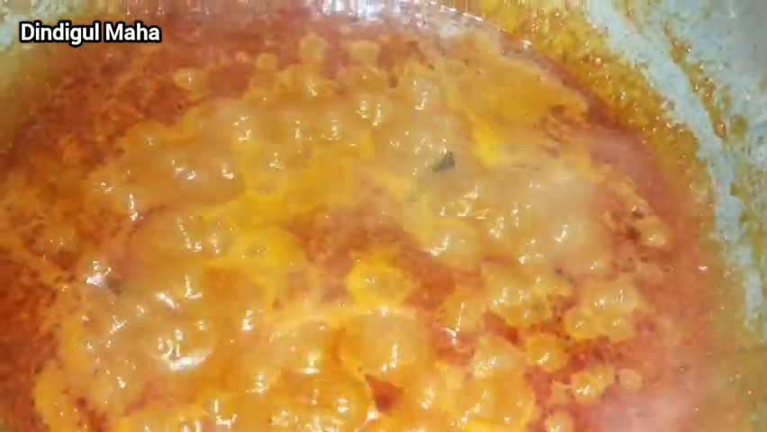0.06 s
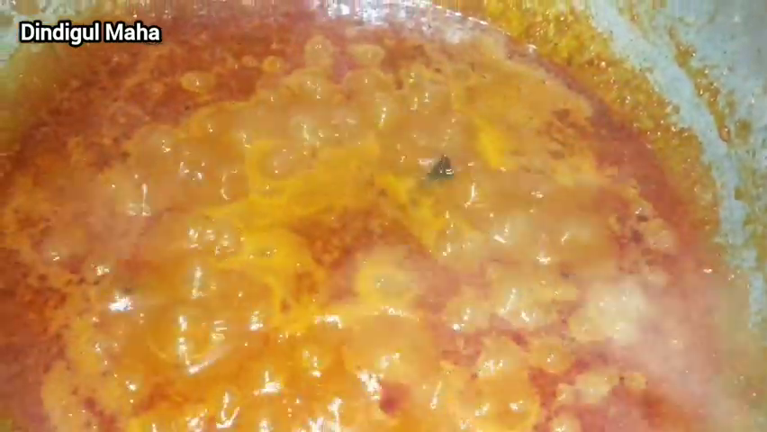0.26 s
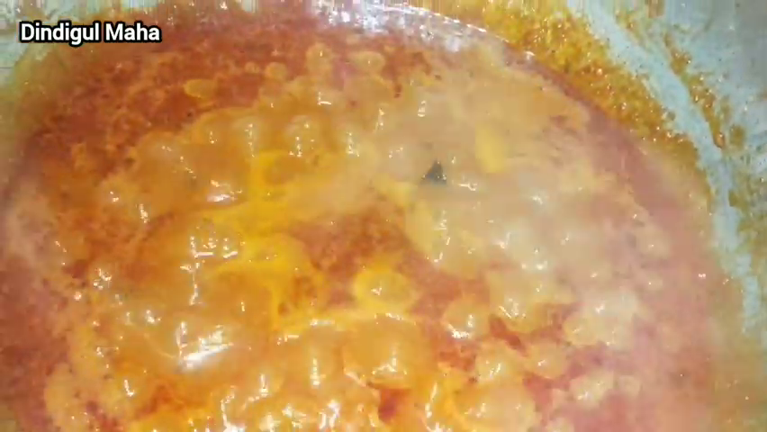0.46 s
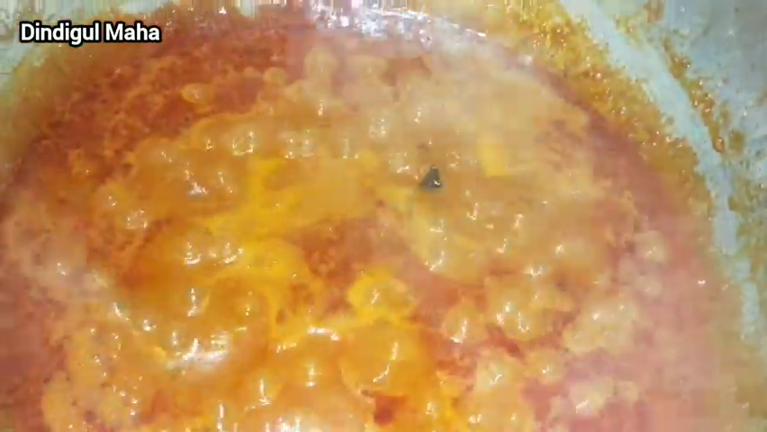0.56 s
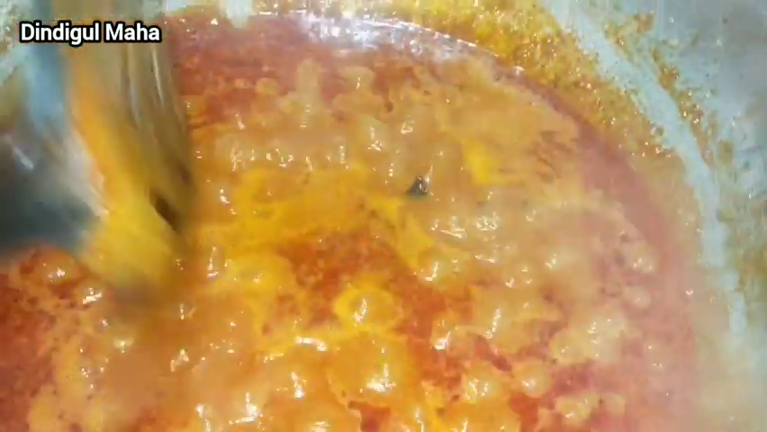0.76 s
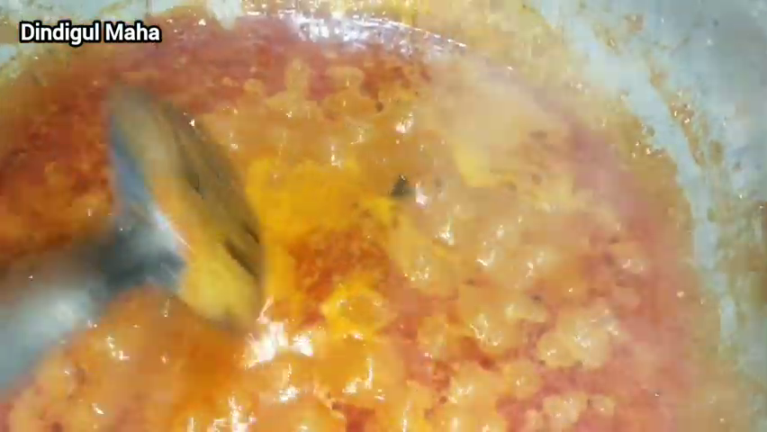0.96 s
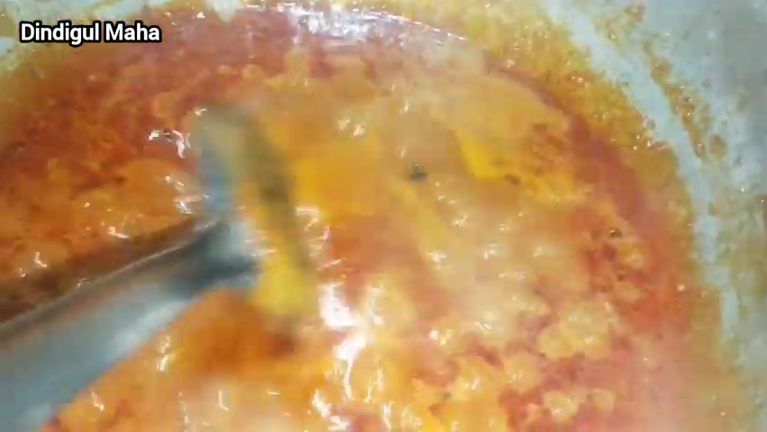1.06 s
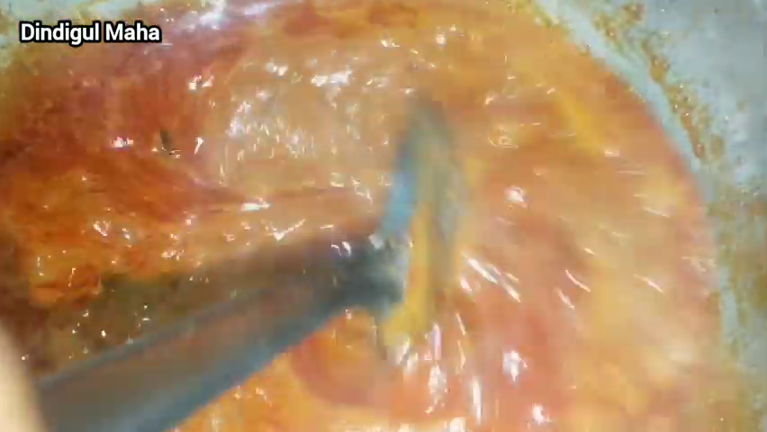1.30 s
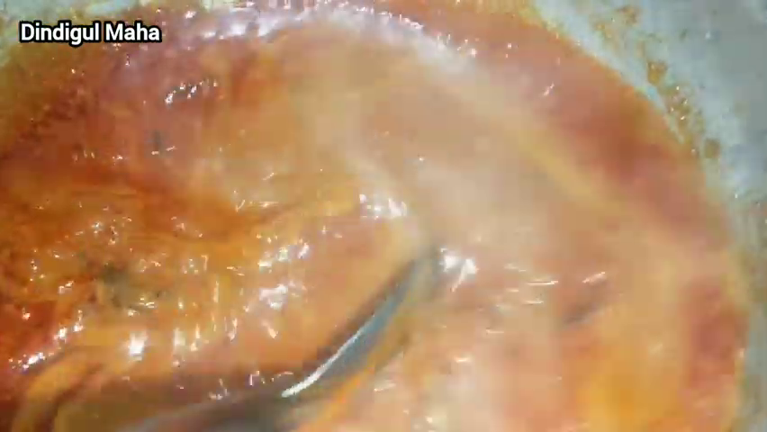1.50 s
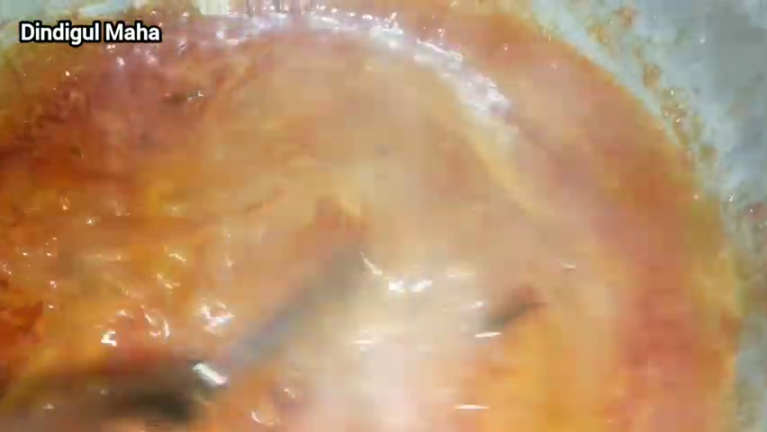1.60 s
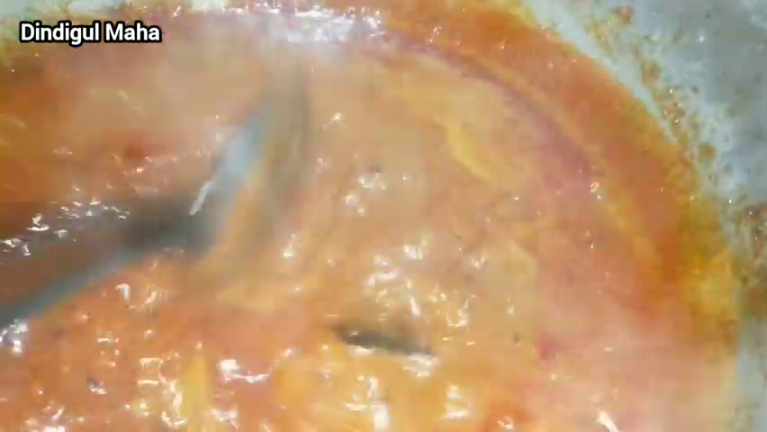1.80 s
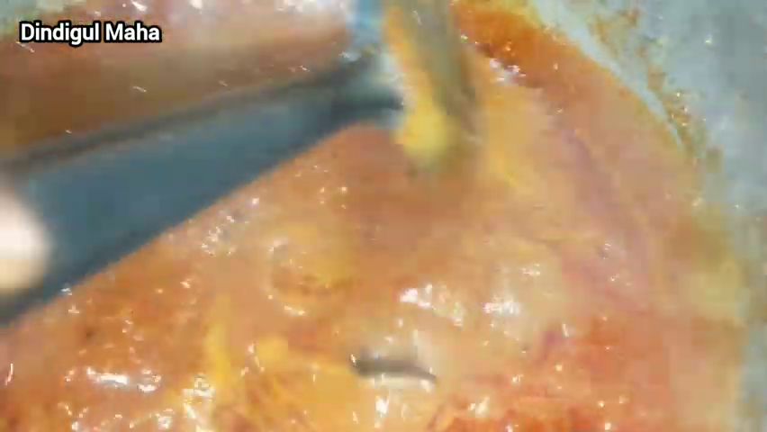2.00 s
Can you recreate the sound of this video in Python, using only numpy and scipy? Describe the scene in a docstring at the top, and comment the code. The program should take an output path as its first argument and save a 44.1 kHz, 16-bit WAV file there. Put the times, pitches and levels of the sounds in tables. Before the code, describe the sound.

Simmering sauce pops and sizzles close up as steel utensils clatter, then a ladle stirs

```python
"""A small, hard kitchen, with a two-port microphone close to a metal pot of thick, simmering sauce.
Steel kitchenware clatters beside the stove: noise cracks and dying modes ring out together.
Then a ladle dips in and stirs, heard as clusters of wet clicks over a low rumble.
Bubbles pop as short tones of rising pitch, over a faint sizzle of grains and noise and a motor hum."""
import sys
import numpy as np
from scipy import signal
from scipy.fft import rfft, irfft
from scipy.io import wavfile
from scipy.ndimage import uniform_filter1d

SR = 44100
rng = np.random.default_rng(int(sys.argv[2]) if len(sys.argv) > 2 else 0)


def write(x):
    x = np.atleast_2d(x).T
    wavfile.write(sys.argv[1], SR, np.round(np.clip(x, -1, 1) * 32767).astype(np.int16))


N = 90404  # length in samples

# how fast the ring-out dies in each band: frequency_hz, t60_s
DECAY = [(250, 0.32), (700, 0.48), (1700, 0.25), (4600, 0.54), (12000, 0.5)]
# balance of the clatter between the ports: frequency_hz, left_over_right_db
CLATTER_PAN = [(100, -0.5), (300, 1), (1200, -2), (1800, -4.5), (2600, 2.5), (3400, -0.5), (4400, 17),
               (8000, 12), (15000, 11.5)]
# balance of the sauce between the ports: frequency_hz, left_over_right_db
SIMMER_PAN = [(100, -2.5), (400, -3.5), (2400, -7), (3500, -13), (4600, 28), (8000, 14), (15000, 1)]
# seething of the sauce: time_s, low_gurgle_db, mid_bubbling_db, high_crackle_db
SEETHE = [(0, -65, -57.5, -56), (.4, -52, -56.5, -89), (.85, -55.5, -54.5, -59), (1.35, -57.5, -57.5, -57),
          (1.45, -60, -64.5, -60.5), (1.68, -64.5, -77, -65.5), (1.745, -62.5, -84, -76),
          (1.79, -56.5, -56, -56.5), (1.89, -64, -75, -66.5), (1.97, -73, -84, -69),
          (2.05, -76, -67.5, -70.5)]
# an even spectrum or a centred balance: frequency_hz, level_db
FLAT = [(20, 0), (20000, 0)]
SPLIT_HZ = 3720  # body below, treble above
PORT_DELAY_S = .00015


def amp(db):
    """Decibels to gain."""
    return 10 ** (np.asarray(db) / 20)


def unit(x):
    """Scales to rms 1."""
    return x / np.sqrt(np.mean(x ** 2) + 1e-20)


def read(points, hz):
    """Reads a table on a log-frequency axis."""
    f, value = np.transpose(points)
    return np.interp(np.log(hz + 1), np.log(f + 1), value)


def level(points, axis=1):
    """A dB curve as gain per sample."""
    table = np.array(points)
    return amp(np.interp(np.arange(N) / SR, table[:, 0], table[:, axis]))


def add(mix, s, sound):
    """Mixes a sound in at time s."""
    part = mix[..., max(round(s * SR), 0):][..., :sound.shape[-1]]
    part += sound[..., :part.shape[-1]]


def colour(x, spectrum, pan, size=4096, lag=PORT_DELAY_S):
    """Causal filter of unit power with a left-right balance; the left port hears lag seconds later."""
    hz = abs(np.fft.fftfreq(size, 1 / SR))
    ratio = amp(read(pan, hz))
    balance = np.array([ratio, np.ones(size)]) * np.sqrt(2 / (1 + ratio ** 2))
    gain = unit(amp(read(spectrum, hz))) * balance
    # the Hilbert transform of the log gain gives the minimum phase
    taps = np.fft.ifft(np.exp(np.conj(signal.hilbert(np.log(gain + 1e-6))))).real
    left, right = signal.fftconvolve(np.atleast_2d(x), taps[:, :size // 2], axes=1)[:, :x.shape[-1]]
    return np.array([np.pad(left, (round(lag * SR), 0))[:len(left)], right])


def split(x, hz=SPLIT_HZ):
    """The parts of a sound below and above a frequency."""
    filters = [signal.butter(5, hz, kind, fs=SR, output="sos") for kind in ("low", "high")]
    return [signal.sosfilt(sos, x) for sos in filters]


def diffuse(count):
    """Noise arriving from all around, alike at the two ports in the bass."""
    # likeness of the two ports: frequency_hz, correlation (0 to 1)
    likeness = [(60, 0.45), (150, 0.99), (350, 1), (700, 0.31), (2000, 0.2), (6000, 0.26)]
    a, b = rfft(rng.standard_normal((2, count)))
    same = np.clip(read(likeness, np.fft.rfftfreq(count, 1 / SR)), 0, 1)
    return irfft(np.array([a, same * a + np.sqrt(1 - same ** 2) * b]), count)


def tail():
    """A dense one-second ring-out, each band of noise dying at its own speed."""
    hz, t, z = signal.stft(diffuse(SR), SR, nperseg=256)
    fade = amp(-60 * t / read(DECAY, hz)[:, None])
    return signal.istft(z * fade, SR, nperseg=256)[1][:, :SR]


def patchy(x):
    """The colour drifts in patches about 500 Hz wide and a tenth of a second long."""
    patch_db = 4.5  # rms depth
    z = signal.stft(x, nperseg=512)[2]
    field = uniform_filter1d(rng.standard_normal(z.shape[1:]), size=6, axis=0)
    field = unit(uniform_filter1d(field, size=16, axis=1))
    return signal.istft(z * amp(patch_db * field), nperseg=512)[1][:, :N]


def narrow(hz, width):
    """Noise in one narrow resonance."""
    f = np.fft.rfftfreq(N, 1 / SR)
    return unit(irfft(rfft(rng.standard_normal(N)) / (1 + (2 * (f - hz) / width) ** 4), N))


def kitchen():
    """A motor hum wavers in pitch and strength over a resonant low rumble and the air of the room."""
    # motor hum, and rumble under the stirring: time_s, hum_db, rumble_db
    low_levels = [(0, -60.5, -73), (.4, -54.5, -61), (.72, -57.5, -60), (.82, -61.5, -58),
                  (1.15, -66, -54.5), (1.38, -64, -57.5), (1.47, -74, -71), (1.7, -58.5, -61),
                  (1.85, -59.5, -69), (2.05, -60.5, -64)]
    # resonances of the rumble: centre_hz, width_hz, relative_db
    drone = [(74.85, 5, -5), (126, 17, -7)]
    # colour of the room's air: frequency_hz, relative_db_per_hz
    air = [(20, -13.5), (75, 5.5), (140, -3.5), (180, 12), (230, -3.5), (400, -2), (700, -1), (8000, -47)]
    hum_hz, wander_hz, waver, waver_hz, air_db = 103.5, 4, 0.38, 34, -60.5
    pitch = hum_hz + wander_hz * narrow(0, 22)
    hum = np.sqrt(2) * np.sin(2 * np.pi * np.cumsum(pitch) / SR)
    hum = hum * (1 + waver * narrow(0, waver_hz))
    rumble = sum(amp(db) * narrow(hz, width) for hz, width, db in drone)
    room_air = amp(air_db) * colour(diffuse(N), air, [(100, -3.0), (400, -9)])
    return hum * level(low_levels) + rumble * level(low_levels, axis=2) + room_air


def simmer():
    """Countless tiny bubbles tick as rising grains over a wash of steam, levelled band by band."""
    # colour of the simmer: frequency_hz, relative_db_per_hz
    simmer_colour = [(100, -35.5), (180, 6.5), (240, -1.5), (300, 5), (400, -2), (620, 3.5), (950, -9),
                     (1600, -9), (2700, -2), (3400, -12), (3950, -36), (4700, -12), (6000, -19.5),
                     (7200, -30.5), (9000, -43.5), (12000, -35.5), (15000, -50)]
    # sizzle above the seething sauce: time_s, level_db
    sizzle = [(0, -74), (.5, -56), (.85, -59), (1.02, -62.5), (1.06, -57), (1.3, -61.5), (1.45, -71.5),
              (1.75, -78), (1.79, -64.5), (1.95, -90), (2.02, -70.5)]
    fizz_per_s, fizz_spread_db, wash_share = 900, 5.5, 0.83
    gurgle_hz, crackle_hz = 800, 2050  # gurgle below, bubbling between, crackle above
    ticks = np.zeros(N)
    for hz in np.geomspace(450, 9000, 28):
        u = np.arange(0, 1, hz / SR / 5.5)
        grain = np.sin(2 * np.pi * 5.65 * u * (1 + 0.22 * u)) * np.sin(np.pi * np.sqrt(u)) ** 2
        starts = rng.random(N) < fizz_per_s / 28 / SR
        train = starts * amp(fizz_spread_db * np.minimum(rng.exponential(1, N), 3))
        ticks += np.convolve(train, grain * hz)[:N]
    fizz = .5 * unit(ticks) + wash_share * patchy(diffuse(N))
    body, treble = split(colour(fizz, simmer_colour, SIMMER_PAN))
    gurgle, upper = split(body, gurgle_hz)
    bubbling, crackle = split(upper, crackle_hz)
    out = unit(gurgle) * level(SEETHE)
    out += unit(bubbling) * level(SEETHE, axis=2)
    out += unit(crackle) * level(SEETHE, axis=3)
    return out + unit(treble) * level(sizzle)


def blips():
    """Small round bubbles, brief rising tones, crowd between the big ones while the sauce seethes."""
    per_s, centre_hz, octaves = 77, 940, 1.4  # octaves either side of the centre
    periods = 5.5  # length, in periods of the starting pitch
    blip_db, spread_db = 3.5, 3  # over the mid bubbling curve
    out = np.zeros(N)
    for when, pitch, size in rng.random((int(per_s * N / SR), 3)):
        hz = centre_hz * 2 ** (octaves * (2 * pitch - 1))
        u = np.arange(0, 1, hz / SR / periods)
        blip = np.sin(2 * np.pi * periods * u * (1 + 0.45 * u)) * np.sin(np.pi * np.sqrt(u)) ** 2
        add(out, when * N / SR, amp(blip_db + spread_db * (2 * size - 1)) * blip)
    return colour(out, FLAT, SIMMER_PAN) * level(SEETHE, axis=2)


def pops():
    """A bursting bubble rings for a few cycles, rising in pitch, with a wet splash and some room."""
    # bursting bubbles: start_s, level_db (before the trim), starting_pitch_hz, decay_s (time constant)
    bursts = [(0.816, -34, 1070, 0.0018), (.864, -38.5, 1450, 0.0015), (.865, -40, 580, 0.0013),
              (.901, -35.5, 1000, .0016), (.923, -33, 1250, 0.0013), (0.988, -38, 1170, 0.0022),
              (1.014, -33.5, 833, 0.0014), (1.030, -29.5, 880, 0.00066), (1.0308, -30, 1635, 0.0026),
              (1.047, -42.5, 5620, 0.0022), (1.067, -38.5, 684, 0.0027), (1.115, -43, 754, 0.0092),
              (1.129, -34.5, 706, 0.0016), (1.168, -40, 1760, 0.0024), (1.182, -38, 1990, 0.0027),
              (1.319, -40.5, 577, 0.0037), (1.338, -36.5, 870, 0.0012), (1.264, -45, 520, .0015),
              (1.485, -42.5, 1555, 0.0046), (1.5633, -38.5, 3070, 0.0014), (1.5853, -39.5, 2175, 0.0033),
              (1.6228, -45.5, 583, 0.011), (1.630, -41.5, 1090, 0.0022), (1.761, -35, 1390, 0.00071),
              (1.772, -46, 2440, 0.0064), (1.787, -41.5, 1940, 0.0014), (1.806, -38.5, 1460, 0.00033),
              (1.839, -40, 1140, 0.0021), (1.861, -37.5, 1340, 0.0017), (1.889, -47.5, 4970, 0.0019),
              (1.924, -44.5, 1500, 0.0025), (1.939, -48, 4600, 0.0027), (2.041, -44.5, 690, 0.0052)]
    rise_s, glide_per_s, splash_share = 0.00032, 28.3, 0.082
    trim_db, room_db = -2, -4
    t, out = np.arange(SR // 25) / SR, np.zeros(N)
    for s, db, hz, decay in bursts:
        turns = np.cumsum(hz * (1 + glide_per_s * np.minimum(t, .012))) / SR
        splash = unit(uniform_filter1d(rng.standard_normal(len(t)), size=14))
        shape = (1 - np.exp(-t / rise_s)) * np.exp(-t / decay)
        tone = shape / shape.max() * np.sin(2 * np.pi * turns)
        add(out, s, amp(db + trim_db) * tone * (1 + splash_share * splash))
    room = tail()
    wet = signal.fftconvolve(out[None], room / np.linalg.norm(room[0]), axes=1)[:, :N]
    return colour(out + amp(room_db) * wet, FLAT, SIMMER_PAN)


def squelches():
    """Sauce tears from the ladle in a tight cluster of wet clicks around one pitch."""
    # squelches as the ladle parts the sauce: start_s, length_s, level_db, centre_hz
    tears = [(0.863, 0.0089, -54, 1610), (0.927, 0.012, -52.5, 1500), (1.029, 0.019, -45, 1770),
             (1.327, 0.028, -58, 1150), (1.485, .008, -51.5, 2200), (1.757, .024, -49, 1940),
             (1.784, 0.012, -46.5, 2730)]
    # balance between the ports: frequency_hz, left_over_right_db
    squelch_pan = [(300, 5), (2000, -10), (3500, 0), (4600, 17), (8000, -7)]
    clicks_per_s, width_octaves = 2000, 0.45
    lead = 64  # samples of room for the filter to ring ahead of the first click
    out, f = np.zeros(N), np.fft.rfftfreq(4096, 1 / SR)
    for s, length, db, hz in tears:
        count, clicks = int(length * SR), np.zeros(4096)
        used = max(int(length * clicks_per_s), 2)
        place, size = rng.random(used), rng.standard_normal(used)
        np.add.at(clicks, (place * count).astype(int), size)
        band = np.exp(-.5 * (np.log2((f + 1) / hz) / width_octaves) ** 2)
        burst = irfft(rfft(np.roll(clicks, lead)) * band)
        add(out, s - lead / SR, amp(db) * burst * np.sqrt(count) / np.linalg.norm(burst))
    return colour(out, FLAT, squelch_pan)


def bank(hz, t60, t):
    """Dying cosines and sines, one pair for each mode."""
    angle = (2 * np.pi * np.outer(hz, t)).astype("f")
    fade = np.exp(np.outer(-np.log(1000) / t60, t).astype("f"))
    return np.vstack([fade * np.cos(angle), fade * np.sin(angle)])


def strike(modes, gains):
    """One blow: its place sets the strength and phase of each mode, drawn at random."""
    spread_db = 1.5
    gains = gains * amp(spread_db * rng.standard_normal(gains.shape))
    phase = 2 * np.pi * rng.random(gains.shape)
    weights = np.hstack([gains * np.cos(phase), gains * np.sin(phase)])
    return (weights * 2 / np.linalg.norm(gains)).astype("f") @ modes


def clank():
    """A hard blow flexes the wall: a bright tick of bare steel on steel and heavily damped modes."""
    # damped modes of the wall: frequency_hz, relative_db
    wall_modes = [(1050, 2.5), (1200, 0), (1840, -1.5), (2380, -1.5)]
    wall_db, t60_s, rise_s = -10.5, 0.018, 0.00079
    tick_db, tick_s = -26.5, .0012
    t = np.arange(SR // 10) / SR
    wall = np.zeros(len(t))
    for hz, db in wall_modes:
        wall += amp(db - 60 * t / t60_s) * np.sin(2 * np.pi * hz * t + 2 * np.pi * rng.random())
    wall *= 1 - np.exp(-t / rise_s)
    tick = split(t / tick_s * np.exp(1 - t / tick_s) * diffuse(len(t)), 8500)[1]
    return amp(wall_db) * colour(wall, FLAT, CLATTER_PAN) + amp(tick_db) * colour(tick, FLAT, CLATTER_PAN)


def rippled(x):
    """The steel radiates its treble in narrow peaks and hollows, the same for every knock."""
    depth_db, spacing_hz = 3, 170.3
    hz = np.arange(3000, 16000, spacing_hz)
    db = depth_db * rng.uniform(-1.7, 1.7, len(hz))
    db -= depth_db ** 2 * np.log(10) / 20  # offsets the power that the peaks add
    ripple = [(hz[0] - spacing_hz, 0), *zip(hz, db), (hz[-1] + spacing_hz, 0)]
    return colour(x, ripple, FLAT, lag=0)


def clatter():
    """Each knock cracks, chatters at the rim, rings the vessel and the utensil, and fills the room."""
    # knocks: start_s, body_db, treble_db, contact_s, crack_db (over the ring), utensil_db (over the ring)
    knocks = [(.097, -39, -37.5, 0.0027, -2.5, 1), (.121, -42.5, -38, 0.012, 3, 3.5),
              (0.156, -42, -38.5, 0.0021, -5, 1.5), (0.2254, -15.5, -19, 0.0015, 1, -15),
              (.346, -31.5, -45, 0.0025, -3, -3.5), (.353, -37.5, -28.5, 0.0035, -3, 3.5),
              (.372, -35.5, -30, 0.0012, 7.5, 1), (.3925, -27.5, -31.5, 0.0034, 6, -3),
              (0.517, -36, -31, .0012, 4, 1.5), (.528, -37, -35.5, 0.0026, -8, 2),
              (.539, -32.5, -37.5, 0.0071, 6, -1.5), (0.6471, -34.5, -34, 0.0029, -4.5, -3),
              (.661, -42, -55, 0.0029, 6, -5), (.759, -42, -45, 0.0039, -1, -6.5)]
    # ringing modes of the steel vessel: frequency_hz, relative_db
    steel = [(300, -18.5), (474, -15), (730, -18), (1005, -14), (1049, -0.5), (1155, -8), (1254, -4.5),
             (1375, -1), (1545, 1.5), (1660, -7), (1733, 3), (1826, -6), (2030, -10), (2143, -3),
             (2680, -11), (3030, -13.5), (4516, -4.5), (5300, -10.5), (6040, -10.5), (6484, -13)]
    # ringing modes of the utensil that taps it: frequency_hz, relative_db
    tapper = [(480, -11.5), (715, -13.5), (1258, -0.5), (1296, 0.5), (1778, -1.5), (2103, -5.5),
              (2823, -6.5), (2895, -3.5)]
    # colour of the crack and the dense ring-out: frequency_hz, relative_db_per_hz
    clatter_colour = [(80, -56), (150, -22.5), (300, -13), (640, -10), (1040, 3), (1460, -2), (1700, 4.5),
                      (2500, -1.5), (2950, -1.5), (3600, -15), (4500, -13.5), (5300, -13), (6400, -21),
                      (6900, -25), (7500, -18), (8000, -36.5), (8800, -23.5), (14500, -31), (15800, -32)]
    # colour of the rim's brief buzz: frequency_hz, relative_db_per_hz
    rim_colour = [(3500, -34.5), (4700, -14), (5150, 0), (5400, 1), (5750, -10.5), (6100, -7), (7000, -20),
                  (8000, -28), (13500, -22), (15500, -35.5)]
    ring_db, ring_t60_s, fine_spread_db = -4, .38, 5.5
    shimmer_db, treble_shimmer_db, fine_db = -6, -2.5, -4.5
    chatter_db, chatter_s = -5.5, 0.026
    same = .52  # likeness of the ring-out from knock to knock
    top_hz_hardest, top_hz_per_db = 17200, 100.5  # softer knocks reach less high
    clank_db_per_db = 1.3  # the clank fades faster than the blow

    t, out = np.arange(SR * 3 // 4) / SR, np.zeros((2, N))
    fine_hz = np.linspace(700, 15500, num=170) + rng.uniform(-45, 45, 170)
    fine = amp(fine_spread_db * rng.uniform(-.85, 1, (2, len(fine_hz))))
    vessel_hz, vessel_db = np.array(steel).T
    tap_hz, tap_db = np.array(tapper).T
    vessel_bank, utensil_bank = bank(vessel_hz, ring_t60_s, t), bank(tap_hz, ring_t60_s, t)
    fine_bank, ports = bank(fine_hz, read(DECAY, fine_hz), t), np.ones((2, 1))
    room, hardest_db = patchy(tail()), max(row[1] for row in knocks)
    for s, body_db, treble_db, contact, crack_db, utensil_db in knocks:
        modes = amp(ring_db) * strike(vessel_bank, amp(vessel_db) * ports)
        modes += amp(utensil_db) * strike(utensil_bank, amp(tap_db) * ports)
        ring = colour(modes, FLAT, CLATTER_PAN)
        crack = amp(crack_db) * t / contact * np.exp(1 - t / contact) * diffuse(len(t))
        chatter = colour(np.exp(-t / chatter_s) * diffuse(len(t)), rim_colour, CLATTER_PAN)
        dense = same * room[:, :len(t)] + np.sqrt(1 - same ** 2) * tail()[:, :len(t)]
        low, high = split(dense)
        shimmer = amp(shimmer_db) * low + amp(treble_shimmer_db) * high
        shimmer += amp(fine_db) * strike(fine_bank, fine)
        rise = 1 - np.exp(-t / contact)
        knock = colour(crack + rise * shimmer, clatter_colour, CLATTER_PAN)
        knock += rise * (ring + amp(chatter_db) * chatter)
        body, treble = split(knock)
        softer_db = body_db - hardest_db
        top_hz = np.clip(top_hz_hardest + top_hz_per_db * softer_db, SR / 10, SR / 2 - 1)
        add(out, s, amp(body_db) * body + amp(treble_db) * split(treble, top_hz)[0])
        add(out, s, amp(clank_db_per_db * softer_db) * clank())
    return rippled(out)


def scene():
    """All sources together, from the room to the steelware."""
    return kitchen() + simmer() + blips() + pops() + squelches() + clatter()


def record(dry):
    """A noise suppressor lowers whatever is faint; then the recorder's band limit."""
    # the suppressor's threshold: frequency_hz, level_db_per_bin
    threshold = [(100, -112), (900, -92), (3000, -98), (6000, -104), (12000, -112)]
    floor_db, edge_hz = -16, 15900
    hz, _, z = signal.stft(dry, SR, nperseg=512, noverlap=384)
    power = uniform_filter1d(abs(z) ** 2, size=5, axis=2)
    gain = power / (power + amp(read(threshold, hz))[:, None] ** 2)
    gain = np.maximum(gain, amp(floor_db))
    quiet = signal.istft(z * gain, nperseg=512, noverlap=384)[1][:, :N]
    band_limit = signal.firwin(511, edge_hz, window=("kaiser", 9), fs=SR)
    return signal.oaconvolve(quiet, band_limit[None], "same")


dry = scene()
out = record(dry)
write(out)
```